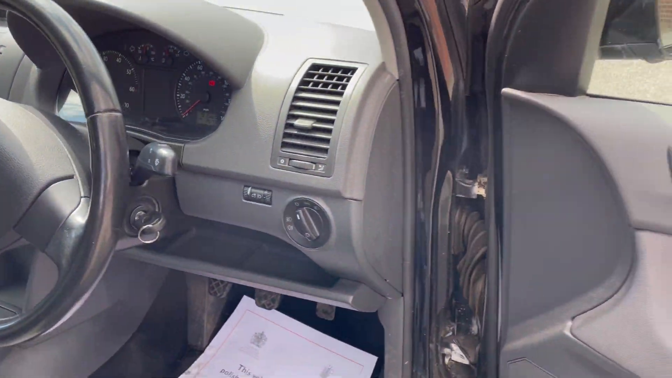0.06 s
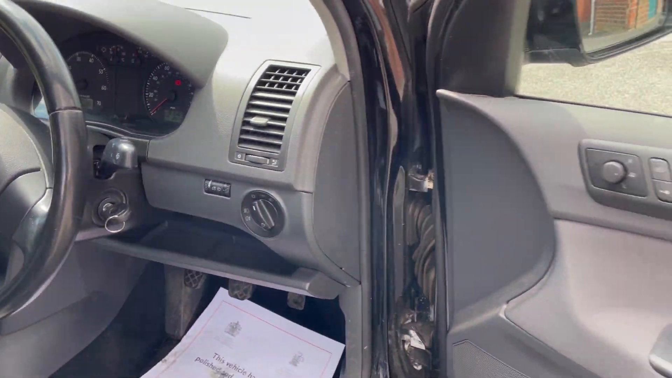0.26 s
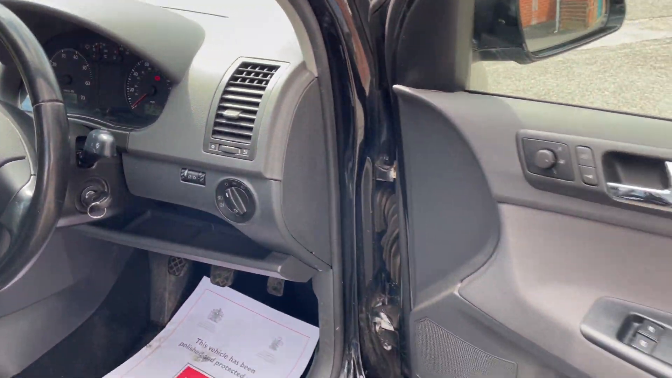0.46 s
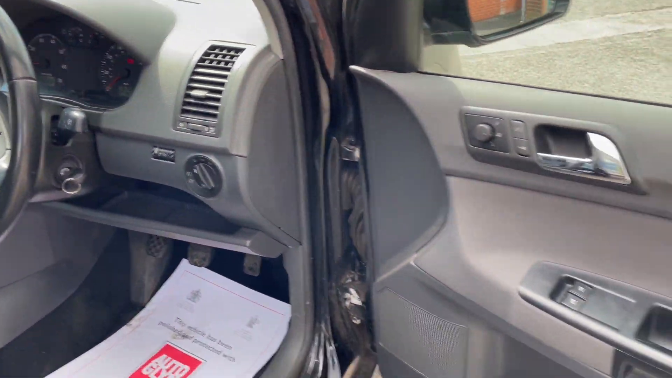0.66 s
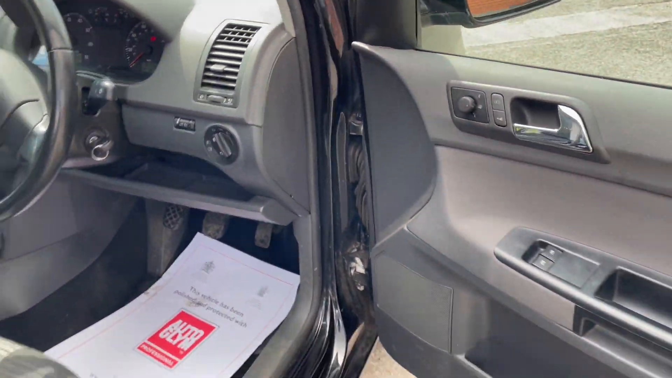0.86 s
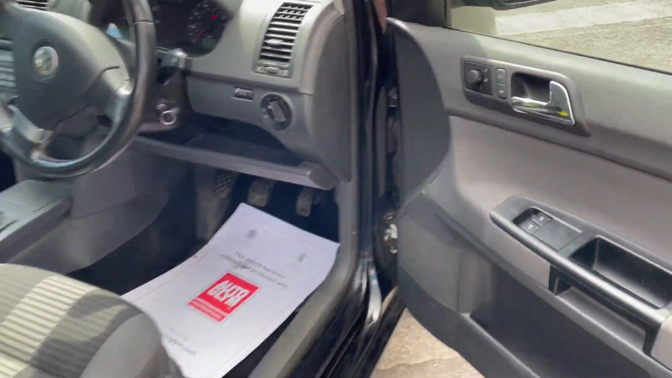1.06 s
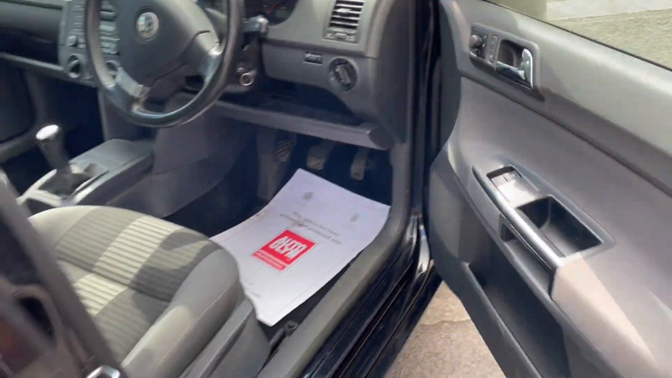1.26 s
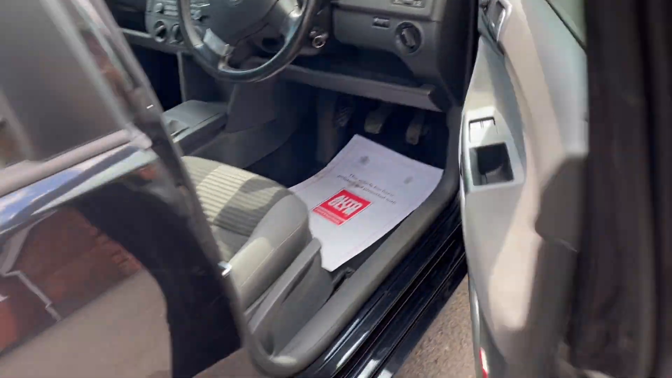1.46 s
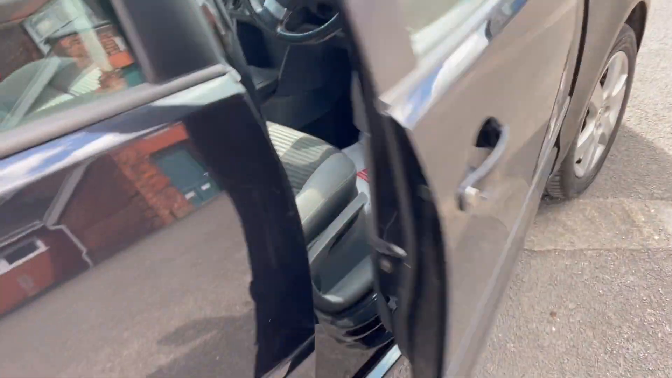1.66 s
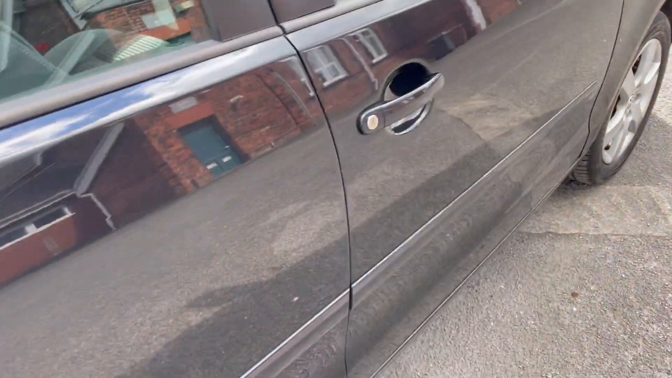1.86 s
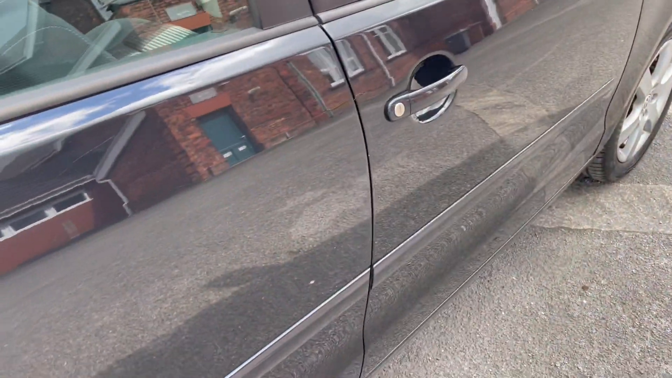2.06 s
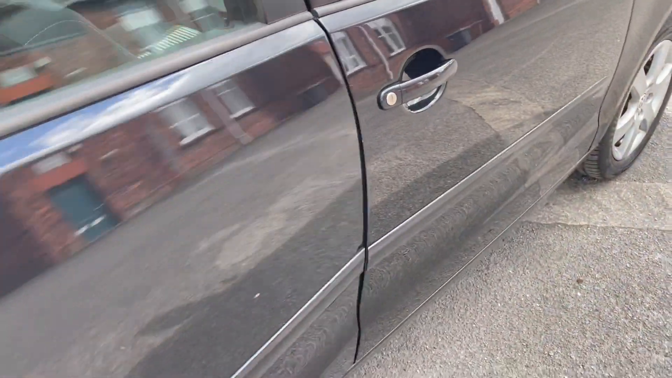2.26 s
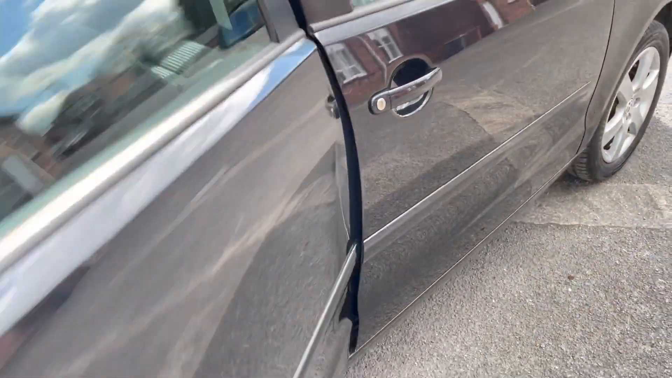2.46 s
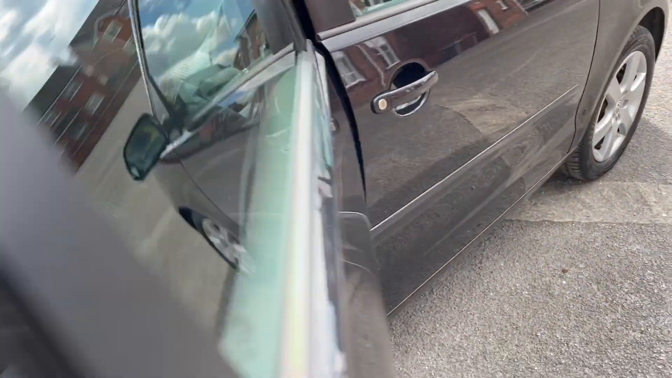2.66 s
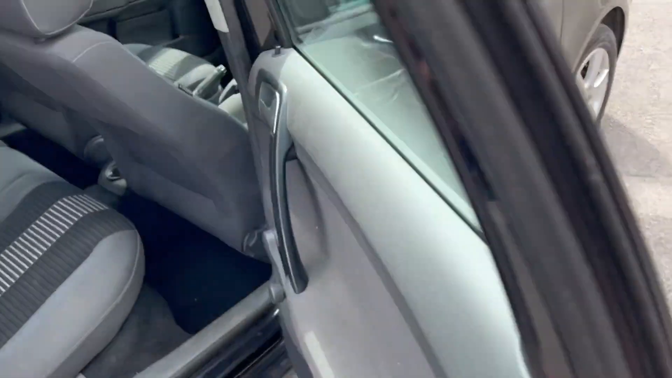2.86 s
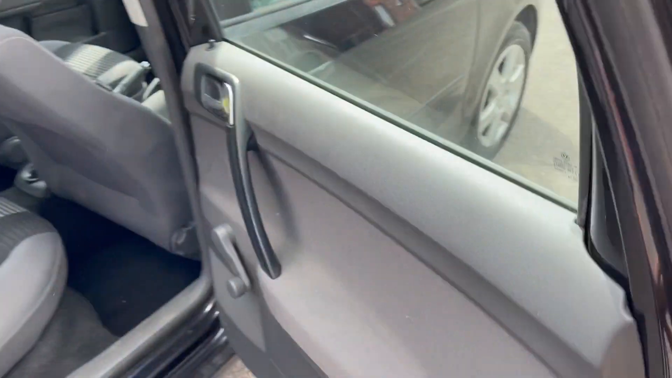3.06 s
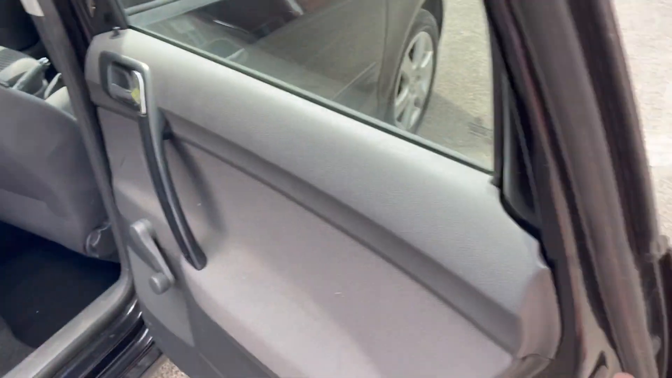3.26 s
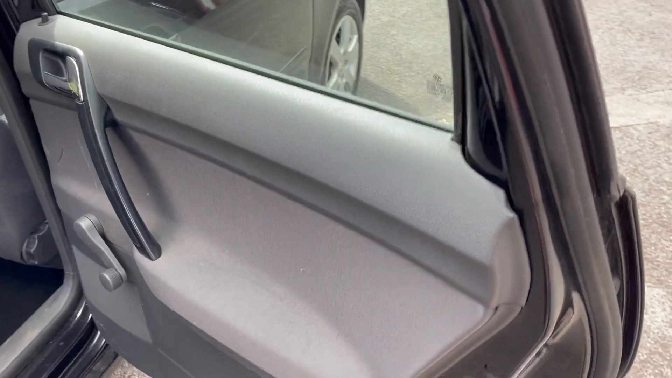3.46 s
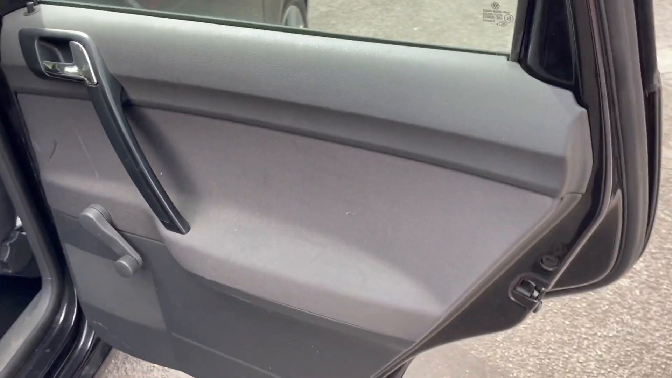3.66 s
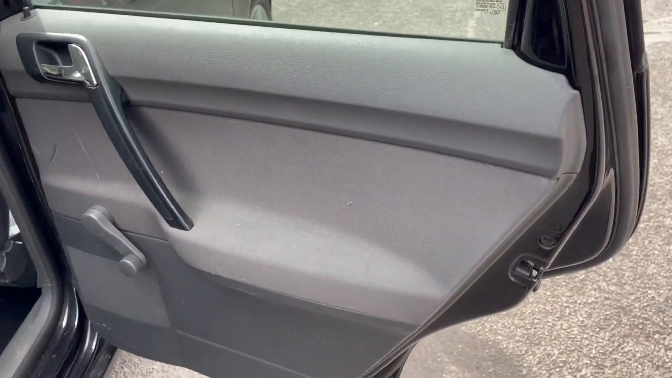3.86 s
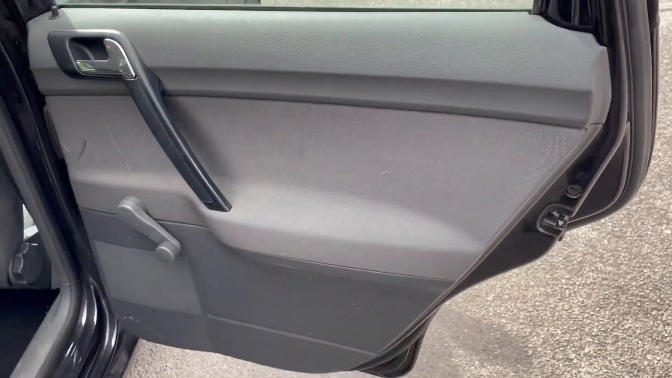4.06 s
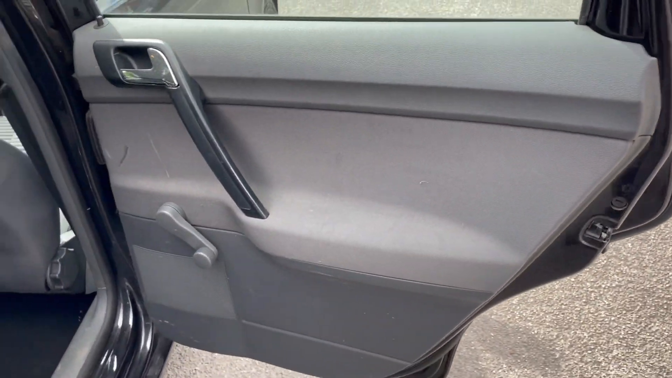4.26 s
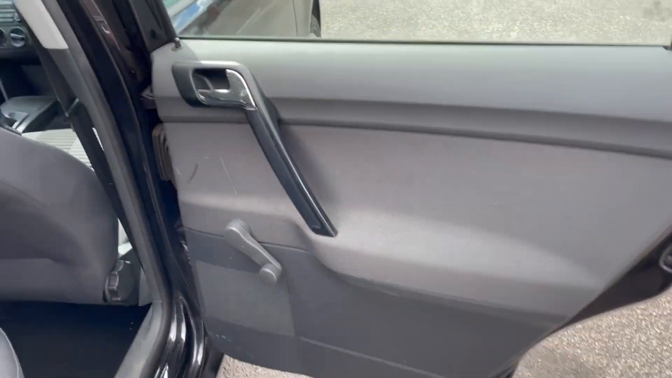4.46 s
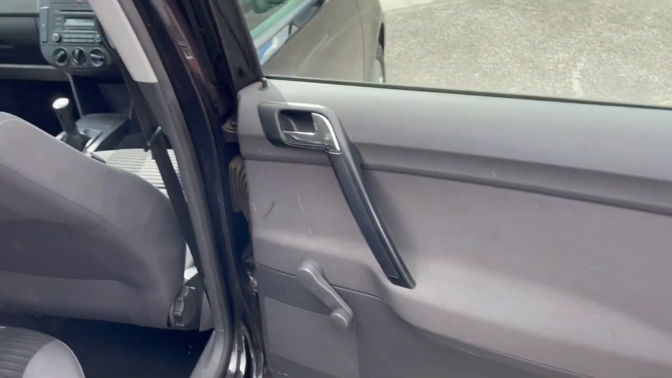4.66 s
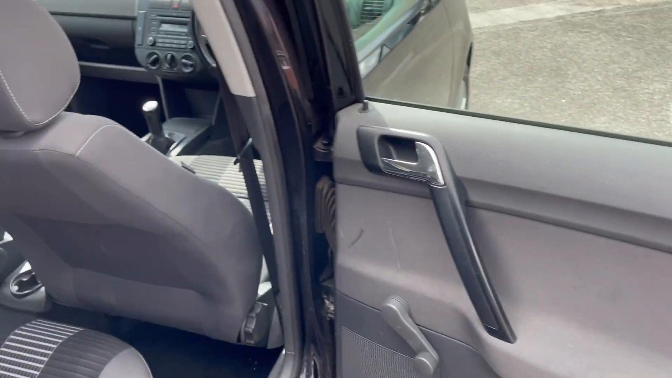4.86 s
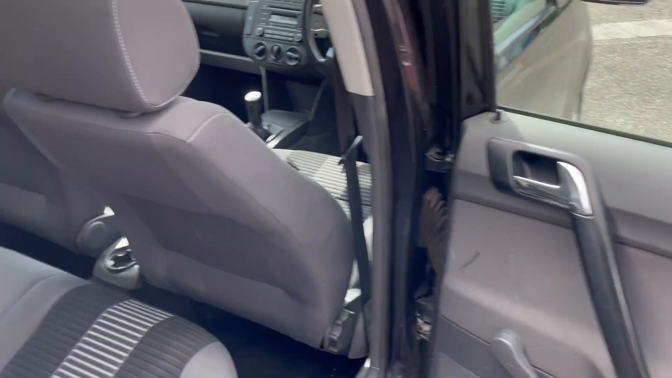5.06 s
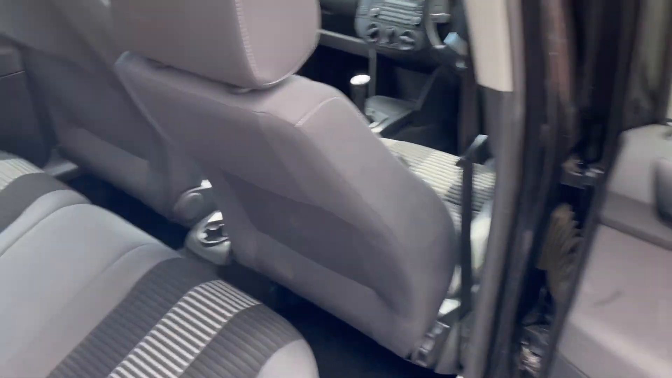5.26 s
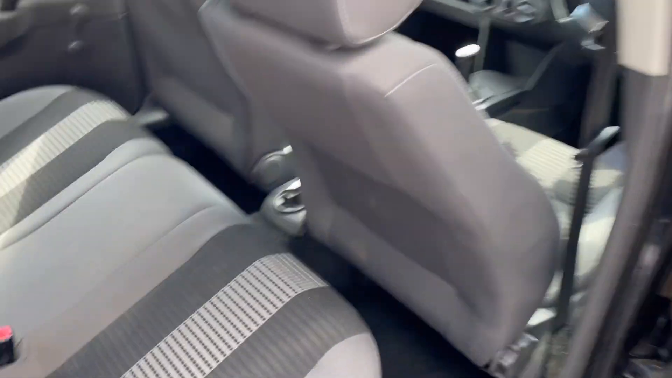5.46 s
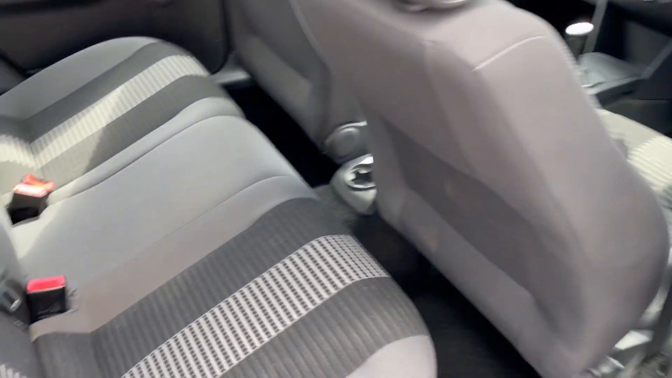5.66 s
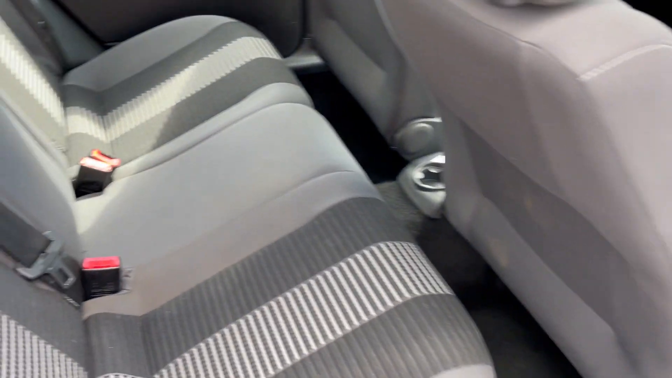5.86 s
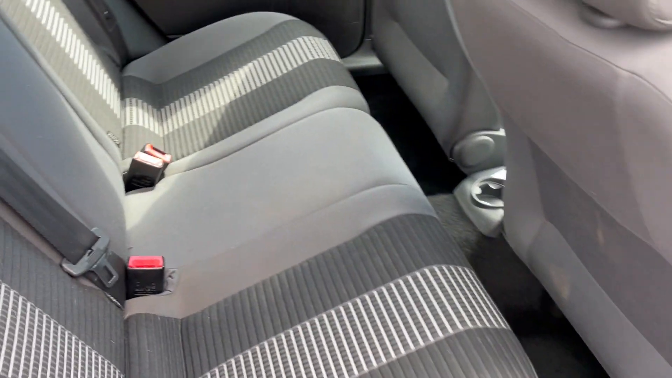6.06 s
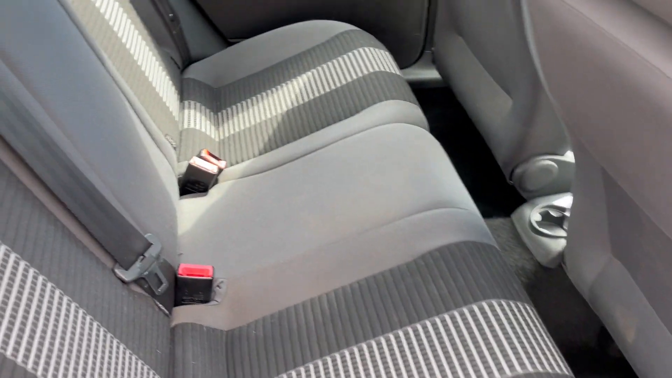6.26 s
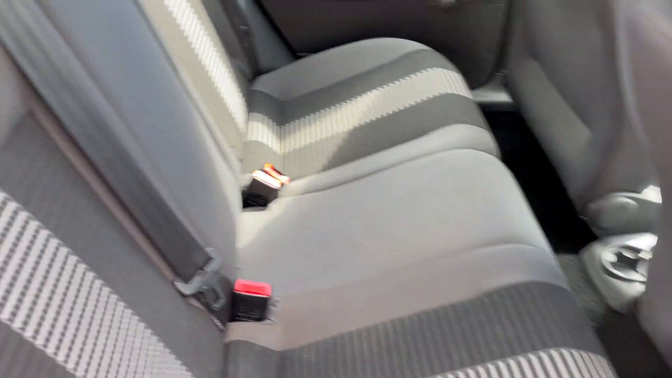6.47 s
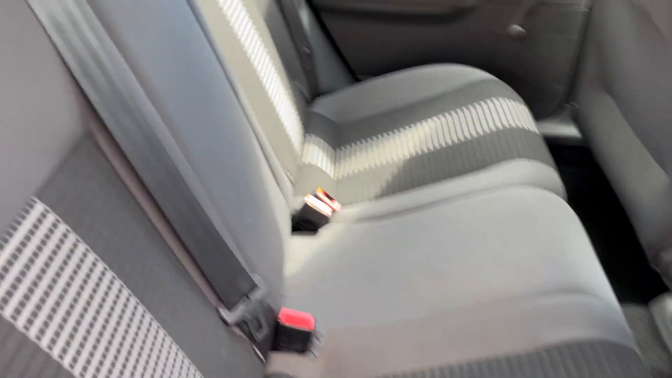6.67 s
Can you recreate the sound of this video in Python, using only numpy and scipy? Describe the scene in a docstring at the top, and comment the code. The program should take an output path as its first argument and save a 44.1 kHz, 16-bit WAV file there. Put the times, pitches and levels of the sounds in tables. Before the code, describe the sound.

Close to a parked car in an open yard, faint taps precede a solid front-door slam with a deep, short boom and loose rattling. A lighter, crisp clunk follows as the rear door unlatches. Then mostly low distant traffic, a few tiny plastic ticks, and a sharp knock at the very end. A faint bird chirps near the start and again late. Stereo handheld microphone.

```python
"""A car's front door is slammed in a yard beside a road; the rear door is unlatched and swung open, trim clicks.
Contacts are bursts of tiny hits that excite damped modes; booms are low resonances set swinging by soft pushes.
A seal brushes as shaped noise and a faint bird is a set of gliding sines, blurred by echoes.
Behind them far traffic is banded stereo noise with the hum of two engines as wavering sines."""
import sys
import numpy as np
from scipy import signal
from scipy.fft import rfft, irfft, next_fast_len
from scipy.io import wavfile
from scipy.ndimage import uniform_filter1d

SR = 44100
rng = np.random.default_rng(int(sys.argv[2]) if len(sys.argv) > 2 else 0)


def linear_from_db(decibels):
    """Turn decibels (scalar or array-like) into linear amplitude factors; 0 gives 1."""
    return 10 ** (np.asarray(decibels, float) / 20)


def master_out(mix):
    """Clip the mix to full scale and print it as 16-bit PCM to the path in sys.argv[1]."""
    frames = np.transpose(np.atleast_2d(mix))
    ceiling = np.clip(frames, -1, 1)
    pcm = np.round(ceiling * 32767).astype(np.int16)
    wavfile.write(sys.argv[1], SR, pcm)


N = 296307

# Levels in the tables are relative: later gains and filters still act on them.
# contacts on front door and body: (t/s, panel level/dB, thump level/dB, latch level/dB, tick level/dB)
DOOR_CONTACTS = [(0.351, -24, -61, -39, -60), (0.396, -12, -65, -54, -39), (0.618, -22, -54, -43, -48),
                 (0.8, -44, -21.5, -50, -60), (1.2385, -14.5, -32, -28, -36.5),
                 (1.246, -12, -29.5, -40, -53), (1.482, -17, -30, -31, -45), (1.737, -21.5, -58, -40, -50),
                 (1.835, -14, -46, -34, -64), (1.848, -2.5, -25, -9, -34.5), (1.864, 2.5, -14.5, -22, -19),
                 (1.874, -5, -28, -25, -23), (1.886, -4, -26, -23, -46), (1.8935, 5.5, -9.5, -9.5, -8.5),
                 (1.914, -8.5, -17, -31, -60), (1.934, -11, -11.5, -19.5, -42.5),
                 (1.979, -26, -17, -53, -64), (2.083, -15, -30, -37, -43), (2.104, -20.5, -26, -48, -62),
                 (2.132, -15, -11.5, -70, -51), (2.144, -22, -16.5, -51, -42),
                 (2.176, -16.5, -32, -35, -41.5), (2.186, -15.5, -22.5, -44, -54),
                 (2.226, -26, -36, -32.5, -52), (2.334, -22.5, -29, -34, -48),
                 (2.361, -15.5, -24, -37, -47), (2.6655, -26, -30, -35.5, -41),
                 (2.684, -30, -20.5, -55, -59), (3.157, -17, -39, -45, -69), (3.189, -35, -35, -42, -54),
                 (3.283, -21, -40, -57, -69), (3.629, -36, -28.5, -52, -65), (3.659, -26.5, -29, -58, -72)]
# modes of door skin, glass and latch steel: (f/Hz, level/dB, longest t60/s)
DOOR_MODES = [(128.4, -3, 0.18), (153.6, 3.5, 0.039), (184.8, 6.5, 0.029), (261.5, -5.5, 0.054),
              (334.5, -8.5, 0.22), (394.5, -8, 0.047), (483, -4.5, 0.031), (575, -14.5, 0.028),
              (634, -22.5, 0.023), (747, -10.5, 0.15), (903, -19, 0.019), (1163, -14.5, 0.058),
              (1287, -5, 0.017), (1380, -24, 0.043), (1674, -2.5, 0.012), (2004, -9.5, 0.023),
              (2501, 1, 0.0078), (2870, 1.5, 0.005), (3430, -5.5, 0.0028), (4020, -6, 0.013),
              (4740, -16, 0.01), (5170, -5.5, 0.0026), (6170, 8.5, 0.0013), (9790, 1, .006)]
# rear latch lets go: (t/s, panel level/dB, thump level/dB, latch level/dB, tick level/dB)
LATCH_CONTACTS = [(2.5625, -13, -40, -17, -53), (2.5688, -3, -26, -4, -14), (2.5745, -2, -5, -28, -45)]
# modes of latch and rear door: (f/Hz, level/dB, longest t60/s)
LATCH_MODES = [(157, -3.5, 0.061), (196, -0.5, 0.047), (273, -7, 0.091), (340, -14, 0.072),
               (468, -9, 0.054), (610, -31, 0.02), (762, -3.5, 0.053), (1010, -16.5, 0.026),
               (1300, -7, 0.029), (1693, -4, .02), (2100, -15, .015), (3040, -16, .012), (3920, -31, .01),
               (6130, 7, .01), (8200, 2.5, .008), (10400, -18, .006)]
# clicks of plastic trim: (t/s, panel level/dB, thump level/dB, latch level/dB, tick level/dB)
TRIM_CONTACTS = [(4.007, -24, -44, -37, -24), (4.041, -21, -48, -33, -32), (4.093, -54, -49, -43, -27),
                 (4.137, -45, -48, -43, -54), (4.163, -36, -39, -25, -44), (5.453, -30.5, -45, -46, -46),
                 (6.209, -12.5, -42, -50, -24), (6.401, -36, -46, -40.5, -40), (6.413, -20, -49, -52, -28),
                 (6.428, -29, -47, -60, -60), (6.543, -34, -46, -36, -25), (6.5525, -30, -40, -21.5, -7.5),
                 (6.559, -24, -40, -24, -18), (6.568, -36, -44, -26, -32), (6.572, -20, -38, -34, -44),
                 (6.581, -24, -44, -20, -40), (6.586, -26, -43, -28, -43), (6.592, -34, -46, -20, -28),
                 (6.599, -36, -44, -28, -48)]
# modes of hard plastic: (f/Hz, level/dB, longest t60/s)
TRIM_MODES = [(221, -43, .03), (416, -45, 0.013), (553, -39, 0.0083), (762, -1.5, 0.075),
              (875, -8.5, 0.013), (1336, -7.5, 0.02), (1840, -5, 0.036), (2123, -1.5, 0.035),
              (2602, 1.5, 0.011), (3590, 0.5, 0.006), (7040, -11, 0.0039)]
# centres of the panel, thump, latch and tick bands: (f/Hz)
CONTACT_HZ = (600, 180, 2600, 8500)
# bands in which the bare hits are heard, in the same order: (lower f/Hz, upper f/Hz)
CRACK_BANDS = ((350, 1400), (120, 300), (1400, 5000), (5000, 14000))
# pushes on the cabin air and the car body: (t/s, level/dB, f/Hz)
BOOMS = [(0.796, -20, 96), (1.87, 1, 70), (1.916, -1, 98), (1.946, -1, 50.6), (1.979, -0.5, 67.5),
         (2.125, -6.5, 92), (2.371, -16.5, 112), (2.701, -15.5, 69.5), (3.18, -16.5, 65),
         (3.239, -19.5, 70), (3.629, -20, 62)]
# modes of a catch snapping home: (f/Hz, level/dB, t60/s)
SNAP_MODES = [(870, -13, 0.0058), (1210, -5, 0.014), (2450, 6.5, 0.0045), (2840, -17, 0.0045),
              (6000, -34, 0.0023)]
# rubber seal brushing: (t/s, level/dB)
SEAL_LEVEL = [(3.06, -68), (3.12, -51.5), (3.16, -50), (3.22, -82)]
# reflections from car panels, ground and walls: (nominal delay/s, level/dB)
YARD_ECHOES = [(.0011, -12), (.0026, -7.5), (.006, -13), (0.015, -25), (.027, -38)]
# bird notes: (start t/s, length/s, first f/Hz, last f/Hz, level/dB)
BIRD_NOTES = [(0.036, 0.068, 3620, 3960, -42), (.11, 0.034, 3880, 3720, -48), (.145, .05, 3680, 3900, -47),
              (0.241, .13, 4640, 4560, -51.5), (5.768, .028, 3930, 3380, -49),
              (5.843, .05, 3810, 3560, -48.5), (5.904, 0.083, 3370, 3400, -54)]
# walls that smear the far bird: (nominal delay/s, level/dB)
FAR_ECHOES = [(.011, -6), (.024, -9), (.04, -13)]
# far traffic, which recedes: (t/s, rumble level/dB, roar level/dB)
TRAFFIC_LEVEL = [(0, -35.5, -42.5), (.63, -36.5, -42.5), (1.14, -32.5, -42), (1.4, -29, -42.5),
                 (1.8, -34, -42.5), (2.3, -35, -41.5), (2.62, -31.5, -41.5), (2.9, -32.5, -46.5),
                 (3.5, -33.5, -46), (4, -36.5, -46), (4.75, -43, -49), (5.28, -35, -47.5),
                 (5.75, -39, -49.5), (6.1, -37, -49.5), (6.72, -38, -49.5)]
# mean traffic spectrum: (f/Hz, level per Hz/dB)
TRAFFIC_COLOUR = [(22, -25), (34, -4.5), (49, -0.5), (72, 0.5), (130, -9.5), (282, -16), (403, -21),
                  (893, -23.5), (1700, -29.5), (2330, -33.5), (4760, -38.5), (7000, -43), (8200, -45),
                  (10600, -44), (12500, -45.5), (15500, -52)]
# centres of rumble, drone, roar, hiss and top air: (f/Hz)
TRAFFIC_HZ = (60, 200, 1100, 5500, 12500)
# left-right correlation of the traffic: (f/Hz, likeness/1)
LIKENESS = [(60, 0.96), (180, 0.91), (550, 0.63), (1000, 0.43), (1800, 0.41), (3000, 0.48), (5000, 0.58),
            (7000, 0.42), (8200, 0.94), (11500, 0.76), (14500, 0.87)]
# low hum of two far engines, one leaving, one arriving: (t/s, first level/dB, second level/dB)
HUM_LEVEL = [(0, -39.5, -44), (.6, -35.5, -53), (.95, -32.5, -60), (1.35, -29.5, -60), (1.7, -34.5, -53),
             (2.4, -31, -58), (2.85, -47, -61), (3.3, -37, -38), (3.8, -49, -62), (4.8, -66, -51),
             (5.25, -43, -37), (5.75, -41.5, -54), (6.15, -49, -33.5), (6.45, -49, -42), (6.72, -48, -28)]
# mean pitches of the two engines: (f/Hz)
HUM_HZ = (56.5, 70.1)
# phase by which the left microphone leads: (f/Hz, phase/rad)
PORT_PHASE = [(0, 0), (300, 0), (1640, -.4), (2580, .5), (5000, .4), (5860, -.5), (6630, -.7), (7670, -2.9),
              (8870, -3.3), (9220, -4.2), (11000, -6.1), (12300, -6.4), (13600, -8.3), (13900, -9.4),
              (15300, -9.4)]
# resonances of the microphone and its housing: (f/Hz, width/Hz, gain/dB)
MIC_PEAKS = [(606, 22, 3.5), (2050, 51, 3), (10360, 220, 3.5), (12800, 960, -3.5)]


def rms_one(x):
    """Normalisation: scale to unit mean power."""
    return x / np.sqrt(np.mean(x ** 2) + 1e-20)


def in_time(rows, outside=None):
    """Linear interpolation: each column of a curve gets one value a sample."""
    s, *columns = np.transpose(rows)
    return [np.interp(np.arange(N) / SR, s, column, outside, outside) for column in columns]


def at_hz(points, hz):
    """Interpolation of (f/Hz, value) points along a logarithmic frequency axis."""
    point_hz, value = np.array(points).T
    return np.interp(np.log(hz), np.log(point_hz), value)


def band_weights(centres, hz):
    """Partition of unity: a frequency shares its weight between the neighbouring band centres."""
    order = np.argsort(centres)
    one_hot = np.eye(len(centres))[order]
    log_centres = np.log(np.sort(centres))
    return np.array([np.interp(np.log(hz), log_centres, column) for column in one_hot.T])


def drift(rate_hz):
    """Random modulation: white noise through a two-pole low-pass, with unit rms."""
    step = 40   # samples between the slow values
    r = np.exp(-2 * np.pi * step * rate_hz / SR)
    noise = rng.standard_normal(N // step + 2002)
    slow = signal.lfilter([1], [1, -2 * r, r * r], noise)[2000:]   # the filter has settled
    return np.interp(np.arange(N) / step, np.arange(len(slow)), rms_one(slow))


def ring(push, hz, t60):
    """Damped resonator: a unit click sets a sine of initial height 1 ringing."""
    r = linear_from_db(-60 / (t60 * SR))
    w = 2 * np.pi * hz / SR
    return signal.lfilter([0, np.sin(w)], [1, -2 * r * np.cos(w), r * r], push + 1e-18)


def band_noise(noise, low_hz, high_hz, order=2):
    """Band-pass filtering: mainly the part between two corner frequencies remains."""
    sos = signal.butter(order, [low_hz, high_hz], "band", fs=SR, output="sos")
    return signal.sosfilt(sos, noise)


def struck(contacts, modes, scatter_db, crack_db, soft_hz, late_cycles, chatter_s, shorter, count=2048):
    """Modal excitation: a contact is a dying chatter of hits; modes below soft_hz feel one later push."""
    rows = np.array(contacts)
    t = np.arange(count) / SR
    draws = rng.standard_normal((len(rows), count + len(modes)))
    noise, scatter = draws[:, :count], draws[:, count:]
    # the harder the tick beside the panel, the shorter the chatter; at -30 dB it lasts chatter_s
    hardness_db = rows[:, 4:] - rows[:, 1:2] + 30
    length = np.clip(chatter_s * linear_from_db(-shorter * hardness_db), 1e-3, .016)
    swell = (1 - np.exp(-t / (0.11 * length))) * np.exp(-t / length)   # parts meet gradually, then settle
    chatter = noise * np.abs(noise) ** 1.14 * swell
    chatter /= np.sqrt(np.sum(chatter ** 2, axis=1, keepdims=True))
    start = np.round(rows[:, 0] * SR).astype(int)

    def hits(strength):
        """Superposition of all chatters, each at its own strength."""
        push = np.zeros(N + count)
        np.add.at(push, start[:, None] + np.arange(count), strength[:, None] * chatter)
        return push[:N]

    out = np.zeros(N)
    for k, (hz, mode_db, t60) in enumerate(modes):
        contact_db = rows[:, 1:5] @ band_weights(CONTACT_HZ, hz)
        strength = linear_from_db(contact_db + mode_db + scatter_db * scatter[:, k])
        if hz < soft_hz:
            push = np.zeros(N + count)
            push[start + int(late_cycles * SR / hz)] = strength * (-1) ** k
            soft_push = uniform_filter1d(push[:N], int(SR / hz / 4))   # a quarter cycle wide
            out += ring(soft_push, hz, t60)
        else:
            drive = np.abs(chatter @ np.exp(-2j * np.pi * hz * t))   # how well each chatter suits this mode
            push = hits(strength / np.sqrt(.25 + drive ** 2))
            out += ring(push, hz, min(t60, 32 / hz))   # padding and seals limit t60 to 32 cycles
    for k, (low_hz, high_hz) in enumerate(CRACK_BANDS):   # the hits themselves are heard as a broad crack
        crack = hits(linear_from_db(rows[:, 1 + k] + crack_db[k]))
        out += band_noise(crack + 1e-18, low_hz, high_hz)
    return out


def front_door():
    """Modal excitation of door skin, glass and latch steel by the slam and smaller contacts."""
    return struck(DOOR_CONTACTS, DOOR_MODES, scatter_db=2.5, crack_db=(1.8, 5, 18.6, 2.25),
                  soft_hz=230, late_cycles=0.64, chatter_s=0.01, shorter=0.39)


def booms():
    """Low resonance: each soft push, half a cycle long, sets cabin air or body swinging."""
    out = np.zeros(N)
    for s, level_db, hz in BOOMS:
        push = np.zeros(SR)
        width = int(SR / hz / 2)
        push[:width] = np.hanning(width) * 2 / width
        at = int(s * SR)
        out[at:at + SR] += linear_from_db(level_db) * ring(push, hz, 5.8 / hz)   # loses 60 dB in 5.8 swings
    return out


def rear_latch():
    """Modal excitation of the latch and rear door as the latch lets go."""
    return struck(LATCH_CONTACTS, LATCH_MODES, scatter_db=-0.6, crack_db=(13, 5, 14.7, 3.4),
                  soft_hz=300, late_cycles=0.33, chatter_s=0.0052, shorter=0.3)


def trim_clicks():
    """Modal excitation of small, strongly damped parts of hard plastic."""
    return struck(TRIM_CONTACTS, TRIM_MODES, scatter_db=4.0, crack_db=(1.6, 5, 5.8, 2.5),
                  soft_hz=300, late_cycles=0.13, chatter_s=0.0038, shorter=0.013)


def snap():
    """Impulse response: a catch snaps home as one hard click in a few heavily damped modes."""
    click = np.zeros(N)
    click[int(6.5964 * SR)] = -linear_from_db(-6.5)
    return sum(linear_from_db(mode_db) * ring(click, hz, t60) for hz, mode_db, t60 in SNAP_MODES)


def seal():
    """Friction noise: the brushing rubber gives a short soft hiss, strongest in the treble."""
    noise = rng.standard_normal(N)
    high = rms_one(band_noise(noise, 9500, 13000))
    low = rms_one(band_noise(noise, 3500, 7000))
    level_db, = in_time(SEAL_LEVEL, -200)
    return linear_from_db(level_db) * (high + linear_from_db(-4) * low)


def panned(x, pan_db):
    """Level difference: pan_db is the level of left over right."""
    return x * linear_from_db(np.array([[.5], [-.5]]) * pan_db)


def yard(x, pan_db):
    """Early reflections: direct sound plus a few thin echoes whose delays differ left and right."""
    out = panned(x, pan_db)
    thin = band_noise(x, 500, 6000, order=1)
    for delay_s, echo_db in YARD_ECHOES:
        for side, stretch in enumerate((.8, 1.25)):
            lag = int(delay_s * stretch * SR)
            out[side, lag:] += linear_from_db(echo_db) * thin[:-lag]
    return out


def bird():
    """Frequency modulation: thin, slightly rough whistles glide, and long notes warble."""
    warble_per_s, warble_hz, edge_s = 14.5, 90, .01
    out, t = np.zeros(N), np.arange(N) / SR
    for s, length, first_hz, last_hz, level_db in BIRD_NOTES:
        hz = np.interp(t, [s, s + length], [first_hz, last_hz])
        if length * warble_per_s > 1:   # the note holds a whole warble
            hz = hz - warble_hz * np.cos(2 * np.pi * warble_per_s * (t - s))
        shape = np.clip(np.minimum(t - s, s + length - t) / edge_s, 0, 1)
        strength = np.sqrt(2) * shape * linear_from_db(level_db + 2 * drift(50))
        rough_hz = hz * (1 + .008 * drift(81))
        out += strength * np.sin(2 * np.pi * np.cumsum(rough_hz) / SR)
    return out


def smeared(song):
    """Reflection: the far whistle leans left, blurred by echoes that differ left and right."""
    out = np.array([song, linear_from_db(-5) * np.roll(song, 2)])   # right is weaker and two samples later
    for delay_s, echo_db in FAR_ECHOES:
        for side, stretch in enumerate((1, 1.2)):
            out[side] += linear_from_db(echo_db) * np.roll(song, int(delay_s * stretch * SR))
    return out * linear_from_db(-4.0)


def traffic(patchy_db, low_patchy_db):
    """Filtered noise: third-octave-wide stereo bands follow five interpolated levels and flicker."""
    rumble_db, roar_db = in_time(TRAFFIC_LEVEL)
    mean_roar_db = roar_db.mean()
    swing_db = roar_db - mean_roar_db
    drone_db = mean_roar_db + 3.5 + 0.68 * swing_db   # offset from the roar, share of its swing
    hiss_db = mean_roar_db - 10.5 + 0.9 * swing_db
    air_db = mean_roar_db - 25 + 1.1 * swing_db
    levels = np.array([rumble_db, drone_db, roar_db, hiss_db, air_db])
    swells_db = levels - levels.mean(axis=1)[:, None]
    out = 0
    together = drift(2.5)   # flicker common to all bands
    edges = 22 * 2 ** np.arange(0, 9.7, .32)
    lead = 8000   # samples in which the filters settle
    white = rng.standard_normal((2, 2, N + lead))
    for k, (low, high) in enumerate(zip(edges, edges[1:])):
        mid, side = band_noise(white[k % 2], low, high)[:, lead:]   # neighbouring bands use separate noise
        hz = np.sqrt(low * high)
        alike = np.clip(at_hz(LIKENESS, hz), -1, 1)
        swell_db = band_weights(TRAFFIC_HZ, hz) @ swells_db
        depth_db = low_patchy_db if hz < 250 else patchy_db
        flicker_db = depth_db * (.35 * together + drift(15.0))
        gain = linear_from_db(at_hz(TRAFFIC_COLOUR, hz) + swell_db + flicker_db)
        out = out + gain * (np.sqrt(1 + alike) * mid + np.sqrt(1 - alike) * side * [[1], [-1]])
    total_power = np.mean(np.sum(linear_from_db(levels) ** 2, axis=0))
    return rms_one(out) * np.sqrt(total_power)


def hum():
    """Modulated tones: the two far engines are low sines whose pitch and strength waver."""
    out = 0
    for hz, level_db in zip(HUM_HZ, in_time(HUM_LEVEL)):
        strength = np.sqrt(2) * linear_from_db(level_db + 0.89 * drift(3.8))
        wavering_hz = hz * (1 + .022 * drift(5.8))
        out = out + strength * np.sin(2 * np.pi * np.cumsum(wavering_hz) / SR)
    return out


def scene():
    """Superposition: doors, trim and bird in the yard over the traffic."""
    doors = yard(front_door() + rear_latch() + booms(), pan_db=-0.7)
    trim = yard(trim_clicks() + snap(), pan_db=-2)
    song = smeared(bird())
    road = traffic(patchy_db=1.7, low_patchy_db=2.0) + hum()
    return doors + trim + seal() + song + panned(road, pan_db=-0.6)


def roll_off(x):
    """The treble ends steeply here."""
    return signal.sosfilt(signal.butter(12, 15750, fs=SR, output="sos"), x)


def record(dry):
    """Phase difference and saturation: spaced microphones colour the sound, cut both ends, round peaks."""
    size = next_fast_len(N + 512)
    axis_hz = np.arange(size // 2 + 1) * SR / size
    colour_db = sum(peak_db * np.exp(-((axis_hz - top_hz) / width_hz) ** 2)
                    for top_hz, width_hz, peak_db in MIC_PEAKS)
    hz, radians = np.transpose(PORT_PHASE)
    half_phase = .5 * np.interp(axis_hz, hz, radians) * [[1], [-1]]   # left leads, right lags
    response = linear_from_db(colour_db) * np.exp(1j * half_phase)
    ports = irfft(rfft(dry, size) * response, size)[:, :N]
    ports = signal.sosfilt(signal.butter(4, 29, "high", fs=SR, output="sos"), ports)
    ports = signal.sosfilt(signal.butter(6, 17000, fs=SR, output="sos"), ports)
    rounded = 1.134 * np.tanh(ports / 1.217)
    return roll_off(rounded)


dry = scene()
out = record(dry)
master_out(out)
```